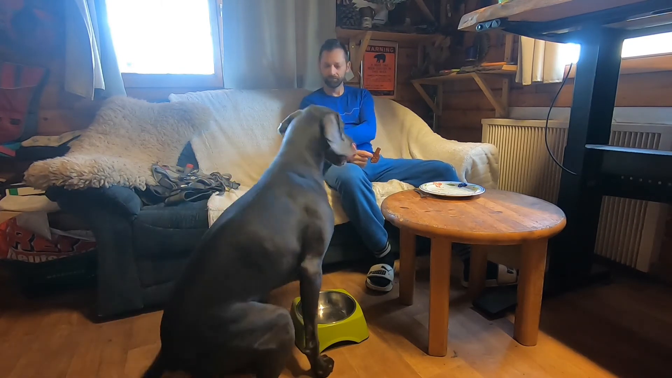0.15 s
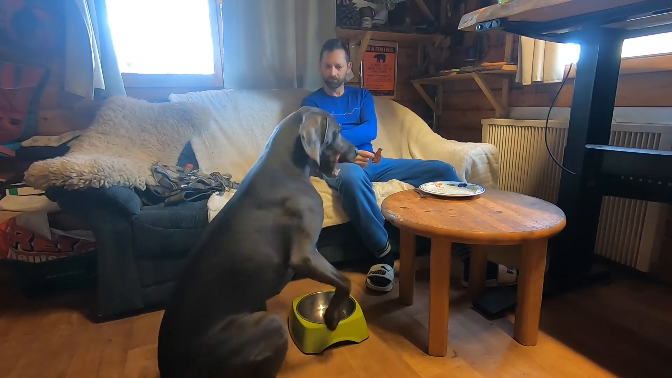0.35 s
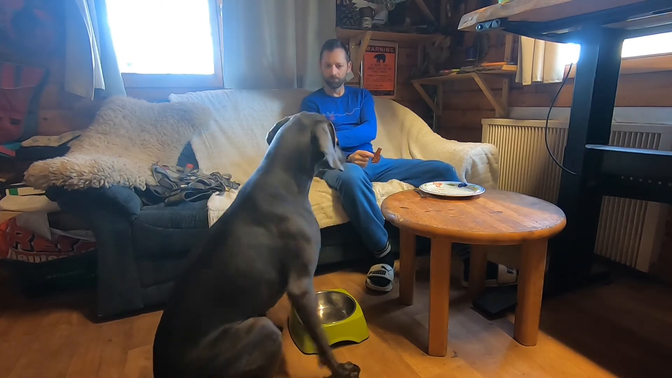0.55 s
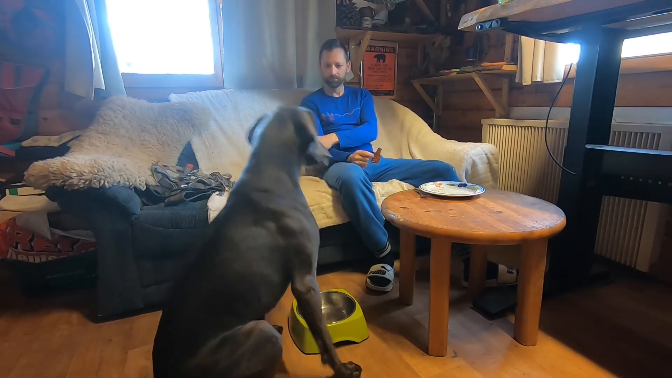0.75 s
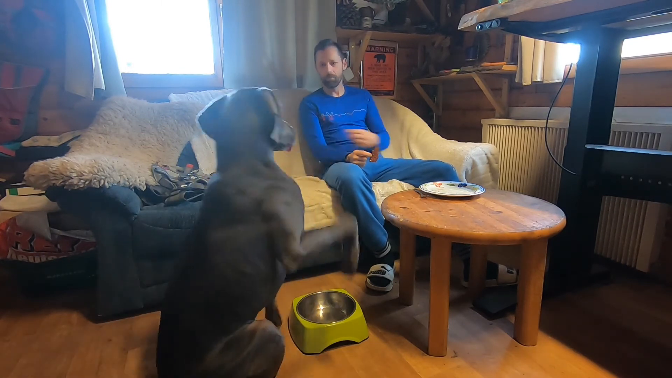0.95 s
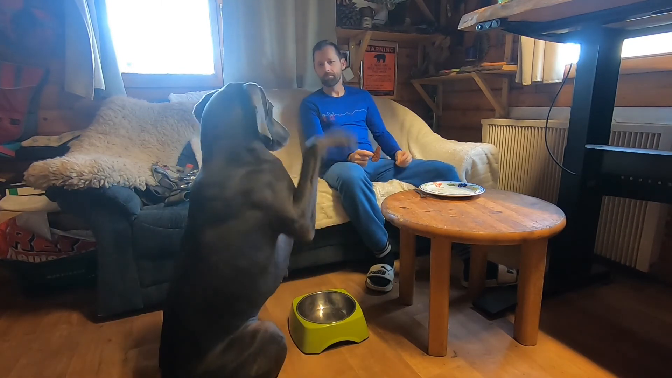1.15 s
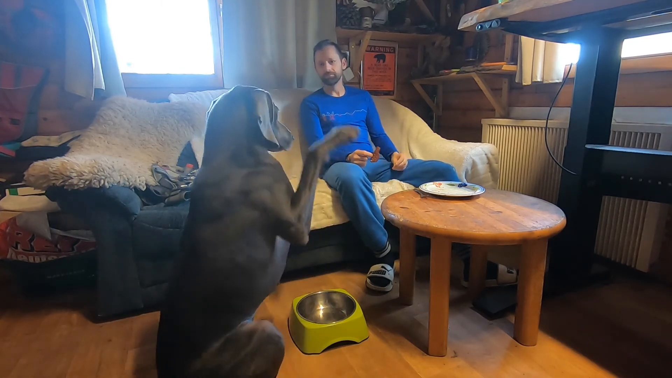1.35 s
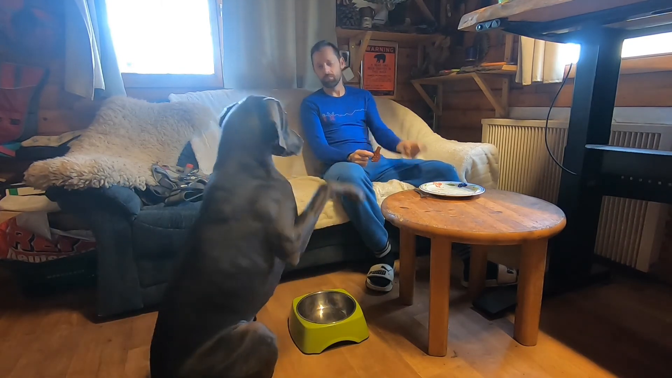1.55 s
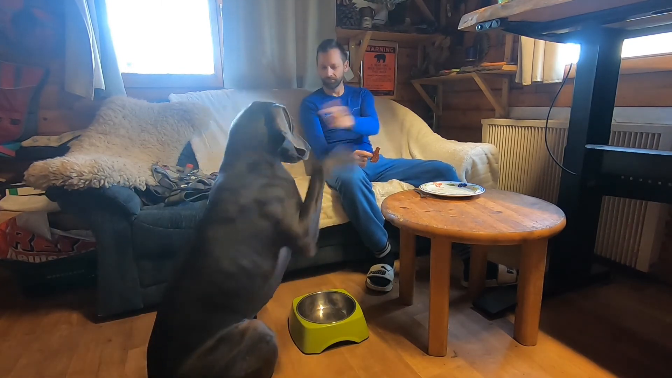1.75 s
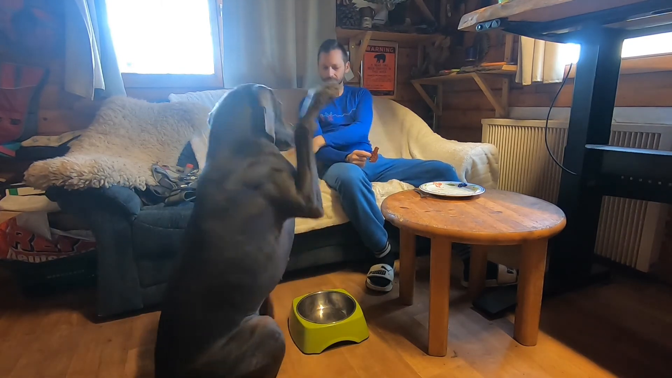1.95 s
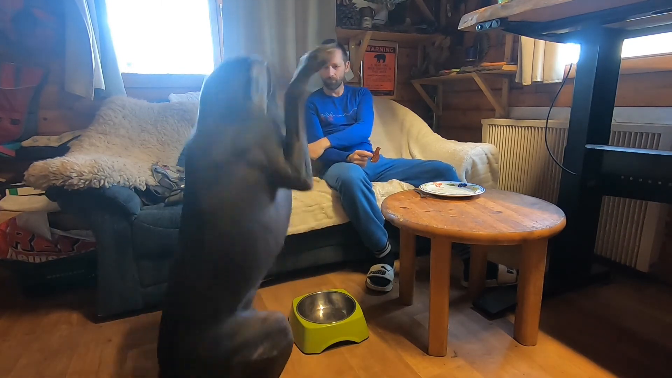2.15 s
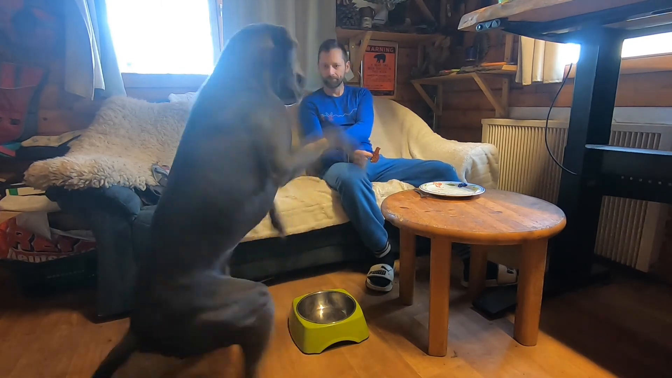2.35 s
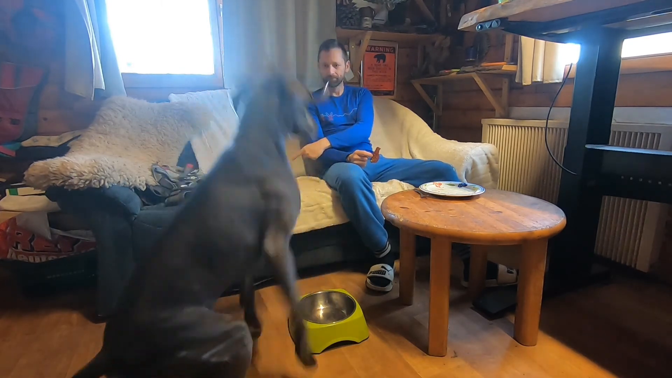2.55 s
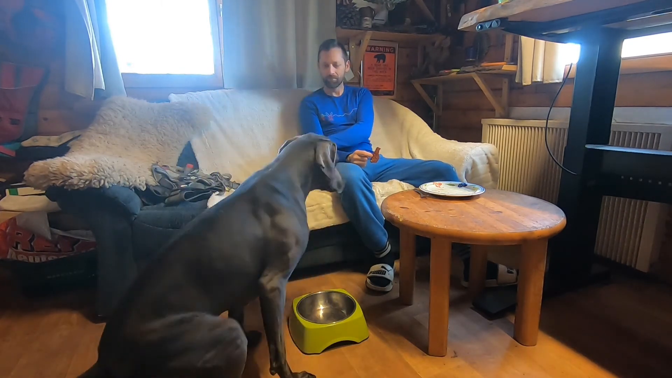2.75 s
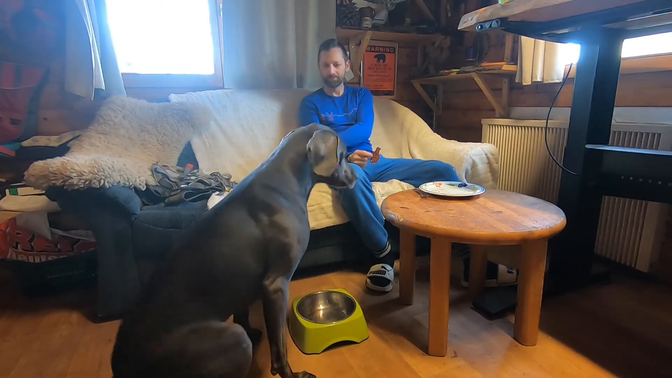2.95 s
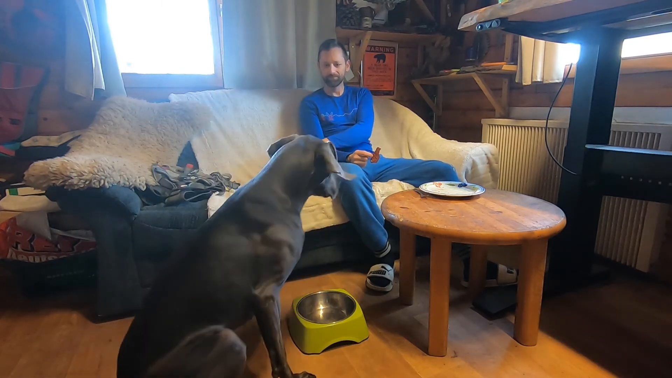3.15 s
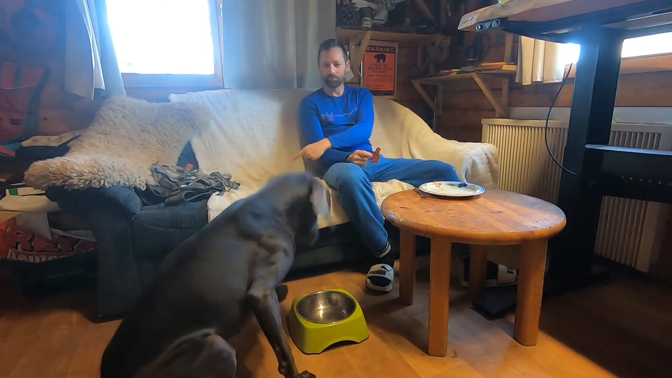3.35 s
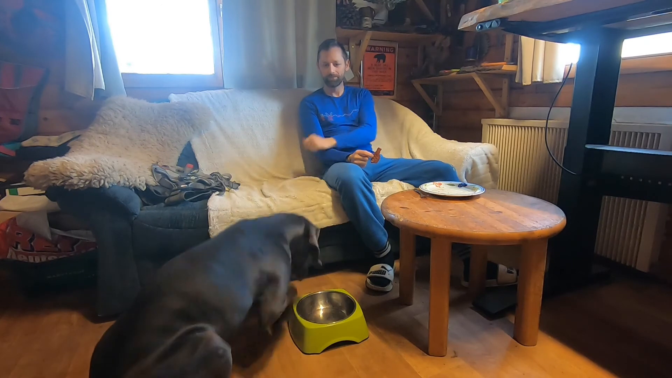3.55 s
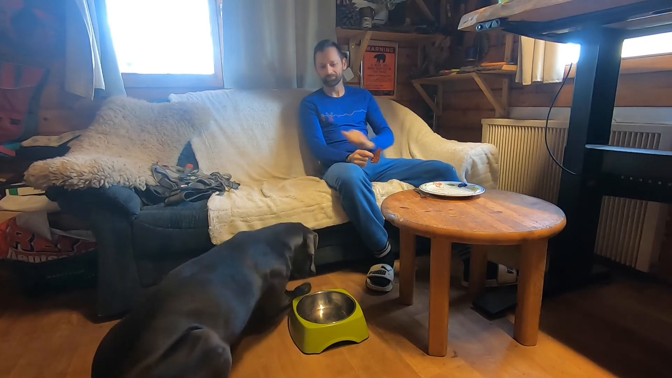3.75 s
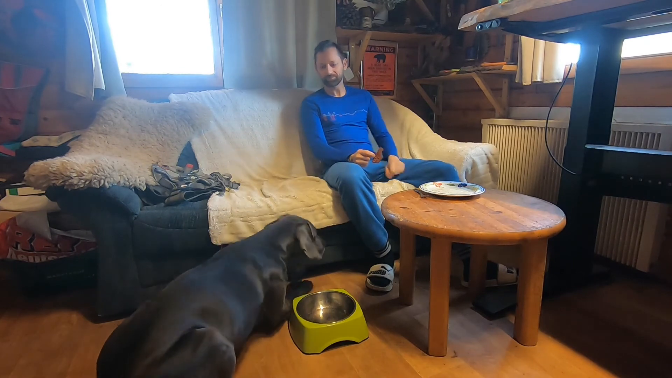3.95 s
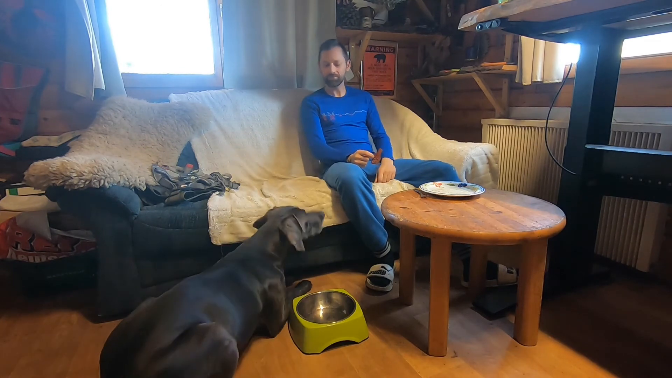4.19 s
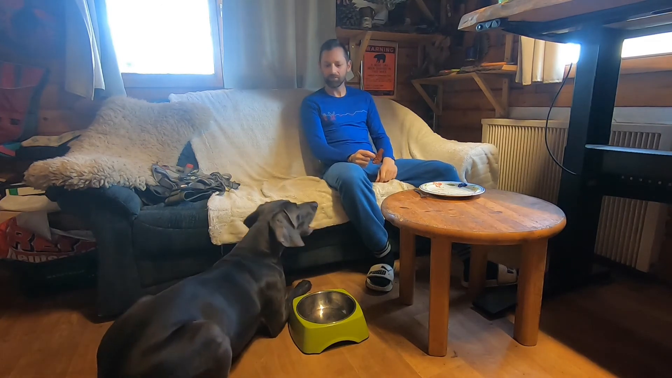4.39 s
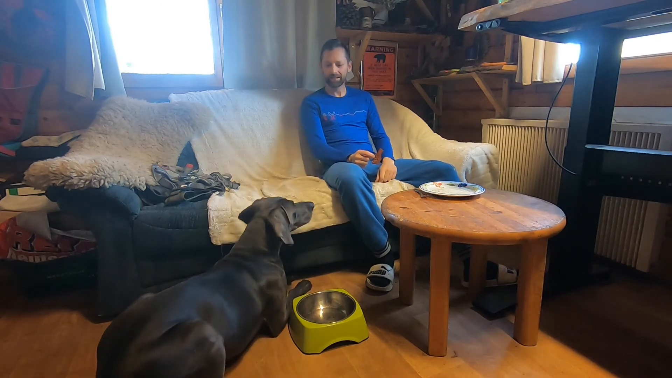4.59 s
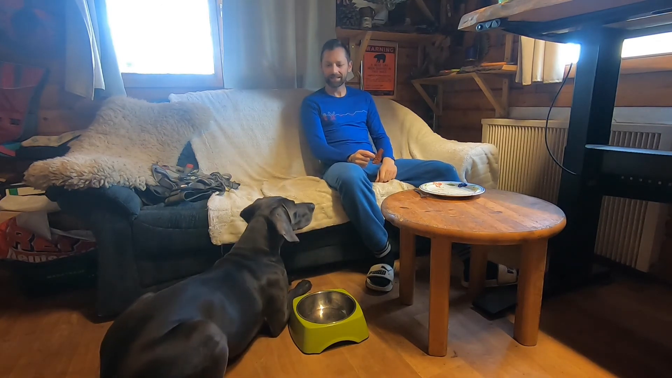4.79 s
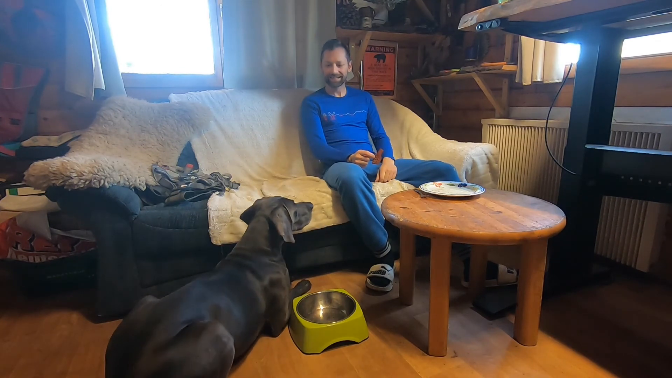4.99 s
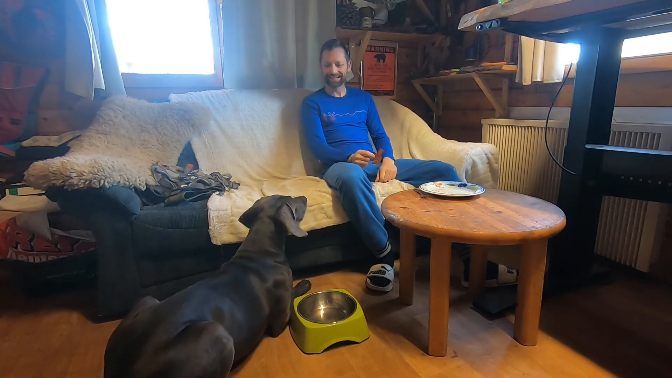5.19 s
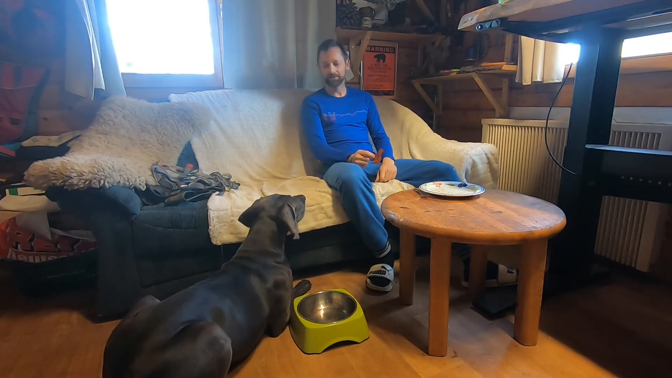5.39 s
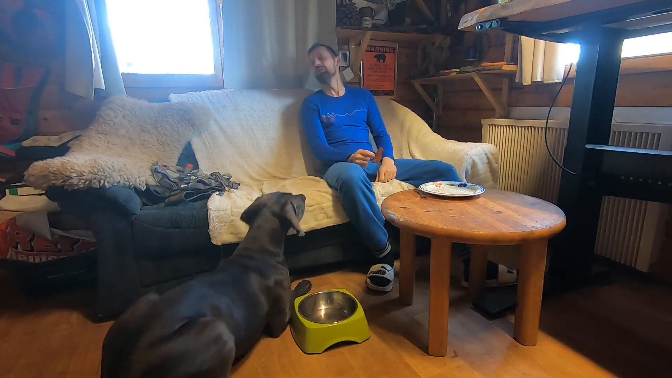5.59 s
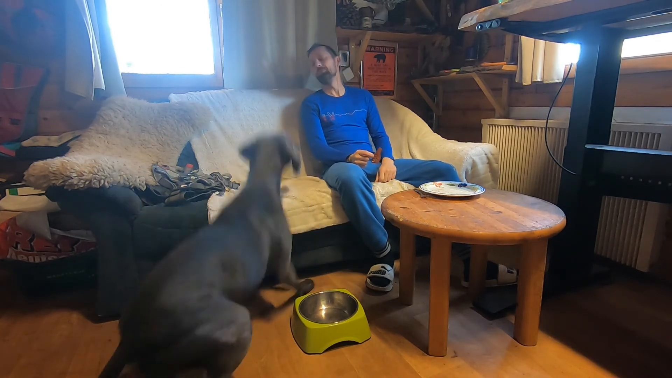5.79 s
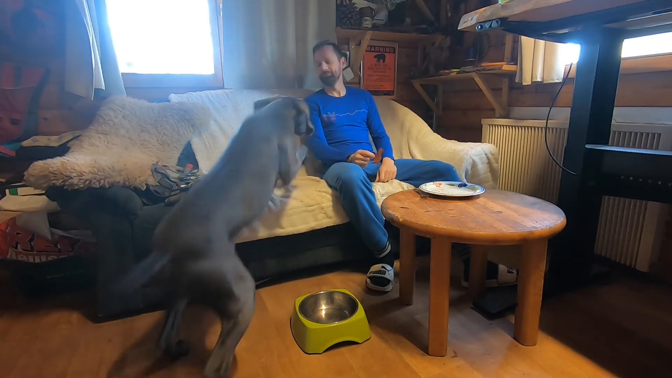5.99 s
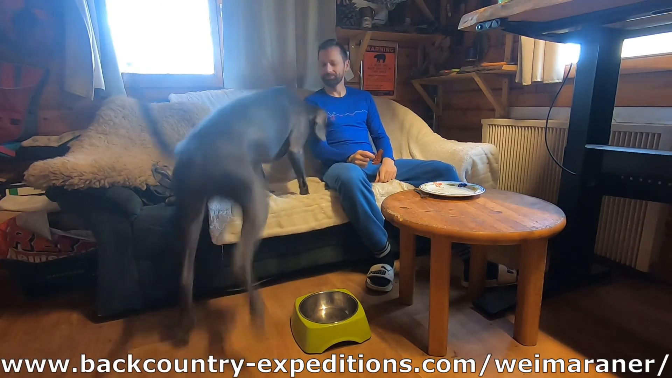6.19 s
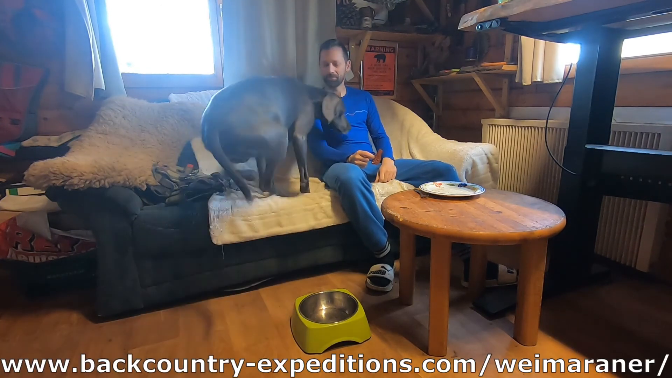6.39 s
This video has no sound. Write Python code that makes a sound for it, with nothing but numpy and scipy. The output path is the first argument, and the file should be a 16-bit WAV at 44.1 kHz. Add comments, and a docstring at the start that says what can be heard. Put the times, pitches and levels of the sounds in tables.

```python
"""A big dog moves on a wooden floor: blows drive the boards and joists, claws tick as shaped clicks.
Strokes of paws and coat are grainy noise that swells and slows; fainter rubbing runs throughout.
One paw slaps a cupped hand: a dull smack and a hollow ring. Three finger snaps: a crack and a cavity tone.
Blows, ticks, pat and snaps get the echoes of a small living room; a quiet murmur lies beneath."""
import sys
import numpy as np
from scipy import signal
from scipy.fft import rfft, irfft, next_fast_len
from scipy.io import wavfile
from scipy.ndimage import uniform_filter1d, map_coordinates

SR = 44100
rng = np.random.default_rng(int(sys.argv[2]) if len(sys.argv) > 2 else 0)


def to_wav(s):
    """Save 16-bit WAV."""
    ch = np.atleast_2d(s).T  # columns
    pcm = np.round(np.clip(ch, -1, 1) * 32767)  # PCM
    wavfile.write(sys.argv[1], SR, pcm.astype(np.int16))


N = 283695

# blows on the floor, before the trims in thuds():
# (time [s], knock level [dB], contact pitch [Hz], boom level [dB], pad slap level [dB])
THUDS = [(0.066, -31.5, 140, -33, -49), (0.355, -18.5, 130, -27, -35), (0.654, -25.5, 157, -44.5, -40),
         (0.789, -31, 142.5, -49, -67.5), (0.953, -31, 167, -52, -45), (1.306, -49.5, 153, -49.5, -47),
         (1.377, -34, 260, -67, -45.5), (1.508, -40, 143, -56, -66), (1.55, -47.5, 184, -54.5, -45),
         (1.956, -41.5, 133, -62, -63), (2.074, -35.5, 220, -69, -39), (2.121, -39.5, 254, -48, -47),
         (2.199, -29, 172, -41, -42.5), (2.346, -51, 148, -40.5, -45), (2.508, -7, 199, -18.5, -14.5),
         (2.712, -26, 161, -37, -36.5), (2.803, -26, 182, -39.5, -40), (3.023, -16.5, 127, -24.5, -38.5),
         (3.162, -28.5, 207, -51, -67), (3.378, -29, 157.5, -52.5, -49), (3.512, -36.5, 215, -74, -51),
         (3.733, -29, 159, -53, -65), (4.031, -25, 149, -56, -42), (4.124, -24, 207, -37.5, -50),
         (4.216, -29, 141, -34.5, -49.5), (4.262, -19, 129, -25.5, -54), (4.42, -25.5, 153.6, -27.5, -68),
         (4.487, -40, 200, -53, -63), (4.886, -51.5, 203.4, -76, -44.5), (5.711, -40, 180, -69, -42),
         (5.869, -35.5, 195, -39, -41), (5.944, -40.5, 179, -44.5, -40.5), (6.036, -43, 222, -68, -51),
         (6.123, -40, 168, -34, -38.5), (6.168, -29.5, 132.5, -26.5, -34), (6.28, -43, 188, -48, -70)]
# floor flexing on its joists: (frequency [Hz], level [dB], t60 [s])
JOIST_MODES = [(28.4, -6, 0.38), (55.6, 5, 0.24), (95.3, 7.5, 0.21)]
# resonances of boards and nearby furniture: (centre [Hz], width [Hz], level [dB])
BOARD_MODES = [(155.2, 7.6, 7.5), (189.3, 5.7, 3), (220.3, 14, 11), (247.3, 9.1, 9.5), (275.9, 12, 10),
               (323.6, 34, 7.5), (364.7, 9.5, 1), (422.5, 54, 4.5), (492.7, 28, -1), (652, 31, 1.5),
               (734.5, 7.7, -2.5), (854, 60, 9), (1061, 37, 8.5), (1192, 89, -2)]
# spectrum of the pad slap: (frequency [Hz], level [dB])
SLAP_SPECTRUM = [(120, -21), (220, -8), (340, -2.5), (440, -4.5), (560, -4.5), (760, -9), (950, -20.5),
                 (1400, -8.5), (3000, -35), (9000, -92)]
# claws on the boards, before the trim in claws(): (time [s], level [dB], centre [Hz])
CLAWS = [(0.0584, -34, 2220), (0.091, -38, 2010), (0.5347, -48, 1130), (0.6395, -25.5, 2090),
         (0.6452, -35, 1050), (1.5402, -41, 1160), (2.0334, -46, 9050), (2.0707, -48.5, 1030),
         (2.5024, -17, 1740), (2.6877, -20.5, 1510), (2.715, -23, 2590), (3.015, -37.5, 5100),
         (3.022, -38.5, 1480), (3.3778, -45, 2460), (3.513, -45, 2020), (3.54, -35.5, 1910),
         (3.588, -37, 1280), (3.8075, -48, 8900), (3.8268, -38, 3100), (4.118, -31.5, 3350),
         (4.139, -36, 1090), (4.4684, -43, 2300), (4.579, -47, 3900), (6.097, -47.5, 980),
         (6.119, -42.5, 1060), (6.1674, -43.5, 1200), (6.2268, -29, 1520), (6.289, -37.5, 1670)]
# spectrum of a claw tick: (frequency [Hz], level [dB])
TICK_SPECTRUM = [(60, -24.5), (200, -21), (700, 7), (1300, 4), (3000, 1), (5000, -3), (9000, -7.5),
                 (11000, -12), (13000, -25.5), (16000, -45)]
# strokes of paws and coat, before the trims in scuffs():
# (time at full speed [s], hiss level [dB], brush level [dB], length [s])
SCUFFS = [(0.097, -50.5, -48.5, 0.038), (0.25, -60, -59, .025), (0.338, -53, -51, 0.056),
          (0.564, -64.5, -83, 0.026), (0.801, -61.5, -49, 0.013), (0.892, -81, -56, 0.037),
          (0.981, -56, -52.5, 0.074), (1.175, -63, -54, 0.033), (1.32, -69, -63.5, 0.12),
          (1.56, -58, -54, 0.032), (1.666, -73, -85, 0.021), (1.857, -56.5, -56.5, 0.024),
          (1.994, -63, -56, .016), (2.222, -63.5, -69, 0.24), (2.339, -53.5, -43, 0.035),
          (2.4, -40, -42.5, 0.069), (2.83, -55.5, -85, .04), (3.044, -59, -43.5, 0.04),
          (3.167, -61, -55, 0.047), (3.588, -62.5, -58.5, 0.075), (3.913, -45, -42.5, 0.042),
          (4.0, -54, -66, 0.083), (4.134, -40, -34, 0.017), (4.261, -53, -48, 0.083),
          (4.546, -67.5, -77, 0.17), (4.74, -72.5, -56, 0.0097), (4.874, -61, -55, 0.043),
          (4.949, -57.5, -50, 0.046), (5.172, -63.5, -55, 0.035), (5.345, -81, -50.5, 0.031),
          (5.404, -74, -54.5, 0.025), (5.705, -55.5, -44.5, 0.054), (5.78, -59.5, -48.5, 0.096),
          (5.852, -45, -40, 0.037), (5.918, -34.5, -38, 0.023), (6.232, -48, -46, 0.03),
          (6.293, -48, -48.5, 0.0083)]
# coat rubbing over time, before the trims in rubbing(): (time [s], brush level [dB], hiss level [dB])
STIR = [(0.0, -62.5, -65), (1.0, -58.5, -70), (1.32, -58.5, -72.5), (1.79, -62.5, -67),
        (2.33, -55.5, -75.5), (2.58, -53, -54), (3.17, -72.5, -73), (3.47, -67.5, -76.5),
        (4.15, -51.5, -56.5), (4.28, -60, -75), (4.62, -59.5, -78), (5.21, -61.5, -66), (5.41, -64.5, -80),
        (5.69, -73, -88.5), (5.86, -51.5, -78), (6.16, -45, -65), (6.3, -74.5, -69), (6.43, -78.5, -79)]
# dull part of the friction: (frequency [Hz], level [dB])
BRUSH_SPECTRUM = [(70, -17), (130, 1.5), (200, -2), (340, -11), (550, -8), (720, -3), (950, -20),
                  (1300, -15.5), (2200, -25.5), (5000, -65.5)]
# bright part of the friction: (frequency [Hz], level [dB])
HISS_SPECTRUM = [(400, -45), (900, -7), (1300, -2), (2200, -0.5), (3200, -6), (5000, -10), (9000, -14),
                 (11000, -25.5), (13500, -31.5), (15500, -41)]
# paw into the hand, before the trims in pat(): (time [s], level [dB])
PATS = [(1.076, -15)]
# hollow ring of the cupped hand: (frequency [Hz], level [dB], t60 [s])
HAND_MODES = [(185, -7.5, 0.28), (220.5, -3, 0.39), (244.2, 1, 0.24), (270.7, -6, 0.33),
              (323.5, -2.5, 0.16), (632, -8, 0.11), (790, -2, 0.097), (1245, 1, 0.055),
              (1284, -12.5, 0.053), (1270, -7, 0.12)]
# smack of paw on hand: (frequency [Hz], level [dB])
SMACK_SPECTRUM = [(40, -32.0), (130, 8.5), (300, 13.0), (480, -7.0), (800, -1.0), (1300, 1.5),
                  (2300, -11.0), (4000, -29.5), (9000, -39.0), (15000, -73)]
# finger snaps: (time [s], level [dB], palm cavity [Hz], cavity t60 [s], crack level [dB])
SNAPS = [(1.776, -23, 2240, 0.01, -3.5), (5.072, -21, 2407, 0.03, 3), (5.254, -13.5, 2520, 0.0039, -3.5)]
# spectrum of the snap's crack: (frequency [Hz], level [dB])
CRACK_SPECTRUM = [(120, -25), (350, 1.5), (1000, -12), (1500, 12.5), (3200, 9), (5500, -1.5), (10000, -1),
                  (12500, -10.5), (16000, -69)]
# room tail: (frequency [Hz], t60 [s])
ROOM_T60 = [(150, 0.23), (700, 0.24), (2000, 0.16), (6000, 0.19), (12000, 0.13)]
# stereo width: (frequency [Hz], side against mid [dB])
WIDTH = [(30, -9.5), (60, -1.5), (130, -16), (260, -16), (500, -8.5), (750, -1), (1100, 3), (2000, -4.5),
         (4500, -5), (8000, 0), (12000, -3.5)]
# the room favours one side: (frequency [Hz], left minus right [dB])
LEAN = [(60, -0.5), (110, 0.0), (200, -1.5), (380, 0.5), (700, -3), (1290, -0.5), (2380, -0.5), (4400, 0),
        (8120, -1.5), (15000, 2)]
# murmur of the quiet house: (frequency [Hz], level [dB])
STILL_SPECTRUM = [(25, -12.5), (90, 0), (170, -16), (400, -30), (750, -4.5), (1500, -13.5), (5000, -27),
                  (10000, -37.5), (15000, -65.5)]

T = np.arange(int(SR * .6)) / SR  # time base of a short sound [s]
SETTLE_S, SETTLE_DB = .03, -5.5  # second push: delay, level against the table's boom level
SPOT_DB = 1.8  # how much tick colour varies between spots of the floor
RISE_SHARE, FALL_SHARE = 0.52, 0.44  # a stroke's swell and slowing, as shares of its length
LINGER_T60_S = 0.18  # how long a stroke hangs in the room
CATCH_PER_S, CATCH_SIZE, CATCH_T60_S = 22, 0.99, 0.17  # rate, mean jump relative to the steady rub, decay
TOP_HZ = 15600


def thuds(rise_cycles=0.75, knock_db=-1, boom_db=3, slap_db=3, pad_hz=2600, firmness=0.99):
    """Each blow pushes the boards for a cycle or two; the pad slaps, the weight settles, the joists flex."""
    out = np.zeros((2, N))
    pad = filtered(impulse(lambda hz: along(SLAP_SPECTRUM, hz)), boards)
    flex = ring(JOIST_MODES, attack_s=0.024)
    for s, db, hz, deep_db, pad_db in THUDS:
        u = T * hz / rise_cycles
        push = np.sin(2 * np.pi * hz * T) * (u * np.exp(-u)) ** 2
        knock = crest(room(filtered(push, boards), wet_db=-2.0, early_db=-6, early_t60_s=0.084))
        boom = crest(room(flex, wet_db=-7, early_db=-16, early_t60_s=.1))
        # the weaker the slap against the knock, the duller
        edge_hz = pad_hz * amp(firmness * (pad_db - db))
        dulled = filtered(pad, lambda f: 1 / (1 + 1j * f / edge_hz - (f / edge_hz) ** 2))
        slap = crest(room(dulled, wet_db=4, early_db=7.5, early_t60_s=0.14))
        add(out, s, amp(db + knock_db) * knock)
        add(out, s + SETTLE_S, amp(deep_db + SETTLE_DB) * knock)
        add(out, s, amp(deep_db + boom_db) * boom)
        add(out, s, amp(pad_db + slap_db) * slap)
    return out


def boards(hz):
    """Response of the floor: the direct blow plus the resonances of the boards."""
    modes = sum(amp(db) * 1j * hz * w / (c * c - hz * hz + 1j * hz * w) for c, w, db in BOARD_MODES)
    return 1 + modes


def claws(level_db=1, focus_db=3):
    """Hard tips tick on the wood, each around its own pitch."""
    out = np.zeros((2, N))
    for s, db, centre_hz in CLAWS:
        def spectrum_db(hz):
            """Tick spectrum, focused by distance in octaves from the claw's pitch."""
            focus = focus_db * np.log2((hz + 1) / centre_hz) ** 2 / 2
            return along(TICK_SPECTRUM, hz) + spot_colour(hz, SPOT_DB) - focus

        tick = room(impulse(spectrum_db), wet_db=6.5, early_db=-2, early_t60_s=0.13)
        add(out, s, amp(db + level_db) * crest(tick))
    return out


def scuffs(brush_db=3, hiss_db=2, lead_s=.15):
    """Each stroke gathers speed and slows, catching as it goes; its sound lingers briefly in the room."""
    out = np.zeros((2, N))
    t = T - lead_s
    keep = fade(1 / SR, LINGER_T60_S) ** 2  # power kept per sample
    for s, db, low_db, length_s in SCUFFS:
        width_s = length_s * np.where(t < 0, RISE_SHARE, FALL_SHARE)
        power = np.exp(-(t / width_s) ** 2)
        swell = np.sqrt(signal.lfilter([1 - keep], [1, -keep], power))
        hiss = amp(db + hiss_db) * friction(HISS_SPECTRUM, grain_db=1.5, colour_db=1.5, size=len(T))
        low = amp(low_db + brush_db) * brush(size=len(T)) * catches(size=len(T))
        add(out, s - lead_s, swell * (hiss + low))
    return out


def rubbing(brush_db=-3, hiss_db=0):
    """The coat rustles faintly and unevenly as the dog shifts its weight."""
    s, low_db, high_db = np.transpose(STIR)

    def level(db):
        """Gain over time from the points in dB."""
        return amp(np.interp(np.arange(N) / SR, s, db))

    hiss = friction(HISS_SPECTRUM, grain_db=2.0, colour_db=1.5, size=N)
    low = brush(size=N) * catches(size=N)
    return level(low_db + brush_db) * low + level(high_db + hiss_db) * hiss


def brush(size):
    """The dull part of the rubbing sounds through the boards."""
    return unit(filtered(friction(BRUSH_SPECTRUM, grain_db=0.5, colour_db=3.0, size=size), boards))


def friction(spectrum, grain_db, colour_db, size):
    """Countless tiny slips of uneven size, coloured by the surfaces."""
    grain = unit(uniform_filter1d(rng.standard_normal(size), size=130))
    slips = rng.standard_normal((2, size)) * amp(grain_db * grain)
    slips = slips * stick_slip(depth_db=3.43, size=size)
    return unit(filtered(spread(slips),
                         lambda hz: amp(along(spectrum, hz) + spot_colour(hz, colour_db, size=24))))


def stick_slip(depth_db, size, rate_hz=45):
    """Uneven gain: the pressure of the contact wavers."""
    knots = rng.standard_normal(int(size * rate_hz / SR) + 4)
    return amp(depth_db * map_coordinates(knots, [np.arange(size) * rate_hz / SR], order=1))


def catches(size):
    """Gain that jumps at random and dies back: hairs and pads catch and let go."""
    chance, jump = rng.random(size), rng.exponential(CATCH_SIZE, size)
    jumps = jump * (chance < CATCH_PER_S / SR)
    return unit(1 + signal.lfilter([1], [1, -fade(1 / SR, CATCH_T60_S)], jumps))


def spot_colour(hz, depth_db, size=14):
    """Random peaks and dips in dB: every spot of contact rings differently."""
    octave = np.log2(1 + hz / 700)
    return depth_db * map_coordinates(rng.standard_normal(6 * size), [octave * size], order=1)


def pat(hollow_db=-6, smack_db=-5, smack_lead_s=.002):
    """The paw lands in a cupped hand: a dull smack and a hollow ring."""
    out = np.zeros((2, N))
    click = impulse(lambda hz: along(SMACK_SPECTRUM, hz))
    cavity = ring(HAND_MODES, attack_s=0.0025)
    for s, db in PATS:
        smack = crest(room(click, wet_db=5.5, early_db=4.0, early_t60_s=0.079))
        hollow = crest(room(cavity, wet_db=-11.0, early_db=-11.5, early_t60_s=0.067))
        add(out, s - smack_lead_s, amp(db + smack_db) * smack)
        add(out, s, amp(db + hollow_db) * hollow)
    return out


def snaps(level_db=0, table_db=-7, table_delay_s=0.012):
    """A finger cracks against the palm and rings its cavity; the table top throws it back."""
    out = np.zeros((2, N))
    crack = crest(impulse(lambda hz: along(CRACK_SPECTRUM, hz)))
    for s, db, hz, t60_s, crack_db in SNAPS:
        cavity = np.sin(2 * np.pi * hz * T) * fade(T, t60_s) / 2
        snap = amp(db + level_db) * crest(cavity + amp(crack_db) * crack)
        add(out, s, room(snap, wet_db=4, early_db=3.5, early_t60_s=0.024))
        add(out, s + table_delay_s, amp(table_db) * snap)
    return out


def room(x, wet_db, early_db, early_t60_s):
    """A short sound with dense echoes from near furniture and the tail of the room."""
    hz, t, z = signal.stft(rng.standard_normal((2, len(T))), SR, nperseg=256)
    decay = fade(t, along(ROOM_T60, hz)[:, None])
    tail = signal.istft(z * decay, SR, nperseg=256)[1][:, :len(T)]
    early = rng.standard_normal((2, len(T))) * fade(T, early_t60_s)
    # echoes start 1 ms after the direct sound
    echoes = sum(amp(db) * unit(spread(part) * (T > .001)) for db, part in [(wet_db, tail), (early_db, early)])
    return x + signal.fftconvolve(x[None], echoes / np.sqrt(len(T)), axes=1)[:, :len(T)]


def still_air(level_db=-79.0):
    """The faint steady murmur of the house: shaped noise."""
    noise = spread(rng.standard_normal((2, N)))
    return amp(level_db) * unit(filtered(noise, lambda hz: amp(along(STILL_SPECTRUM, hz))))


def amp(db):
    """Decibels to gain."""
    return 10 ** (np.asarray(db) / 20)


def unit(x):
    """Scaled to rms 1."""
    return x / np.sqrt(np.mean(x ** 2) + 1e-20)


def crest(x):
    """Scaled to peak 1."""
    return x / (np.abs(x).max() + 1e-20)


def fade(t, t60_s):
    """Exponential decay, 60 dB down after t60."""
    return np.exp(-np.log(1000) * t / t60_s)


def along(points, hz):
    """(Hz, value) points read on a log axis."""
    f, v = np.transpose(points)
    return np.interp(np.log(hz + 1), np.log(f + 1), v)


def filtered(x, response):
    """x through a complex response of frequency."""
    n = x.shape[-1]
    m = next_fast_len(n + SR // 2)
    return irfft(rfft(x, m) * response(np.fft.rfftfreq(m, 1 / SR)), m)[..., :n]


def impulse(level_db, size=2048):
    """Minimum-phase click of the given spectrum, by folding the cepstrum."""
    cepstrum = irfft(np.log(amp(level_db(np.fft.rfftfreq(size, 1 / SR))) + 1e-6))
    cepstrum[1:size // 2] *= 2
    cepstrum[size // 2 + 1:] = 0
    return np.pad(irfft(np.exp(rfft(cepstrum))), (0, len(T) - size))


def ring(modes, attack_s):
    """Damped modes that swell over the attack time."""
    tones = sum(amp(db) * np.sin(2 * np.pi * hz * T) * fade(T, t60_s) for hz, db, t60_s in modes)
    return crest(tones * (1 - np.exp(-T / attack_s)))


def spread(pair):
    """Two unrelated signals, as mid and side, to left and right; width varies with frequency."""
    side = filtered(pair[1], lambda hz: amp(along(WIDTH, hz)))
    return np.array([pair[0] + side, pair[0] - side])


def add(track, s, sound):
    """Mix a sound in at time s."""
    start = round(s * SR)
    sound = sound[..., max(-start, 0):]
    part = track[:, max(start, 0):][:, :sound.shape[-1]]
    part += sound[..., :part.shape[1]]


def scene():
    """The dog, the hands and the room, which leans a little to one side."""
    sound = thuds() + claws() + scuffs() + rubbing() + pat() + snaps() + still_air()
    return filtered(sound, lambda hz: amp(np.outer([1, -1], along(LEAN, hz)) / 2))


def record(dry):
    """Nothing passes above the band limit."""
    return filtered(dry, lambda hz: hz < TOP_HZ)


dry = scene()
out = record(dry)
to_wav(out)
```